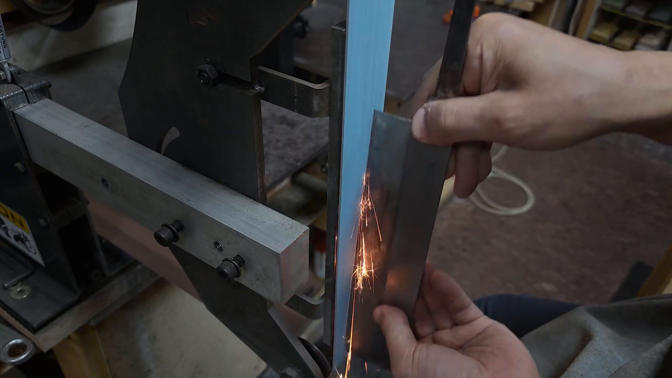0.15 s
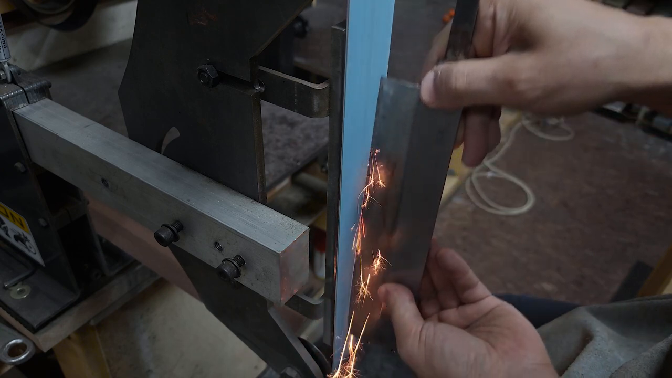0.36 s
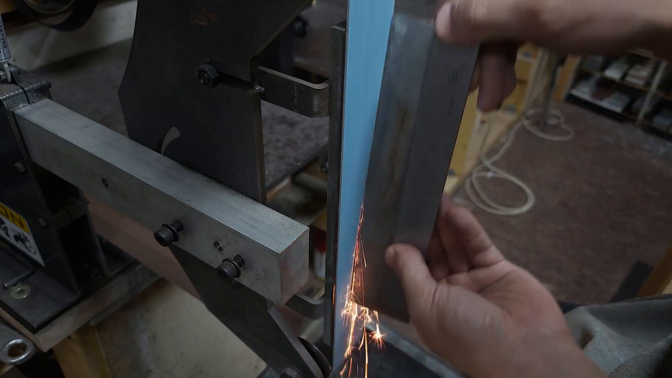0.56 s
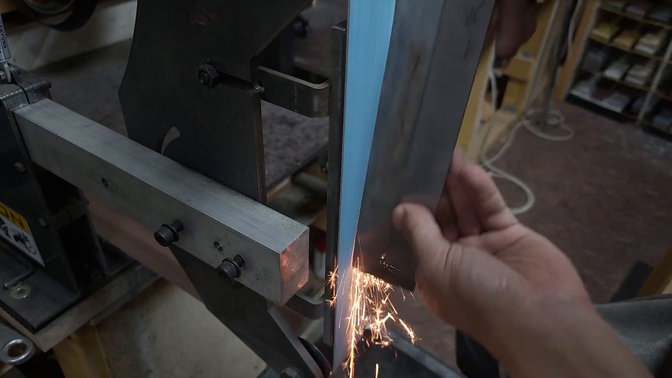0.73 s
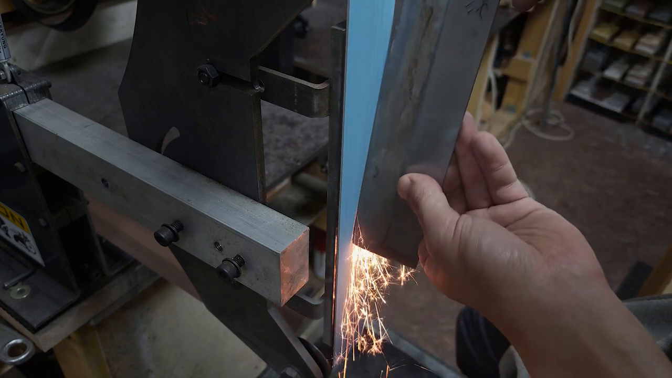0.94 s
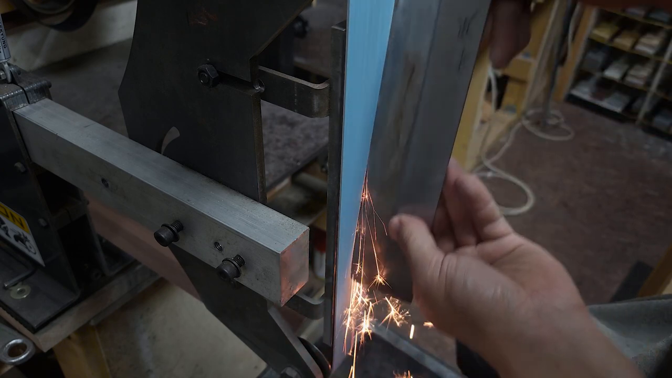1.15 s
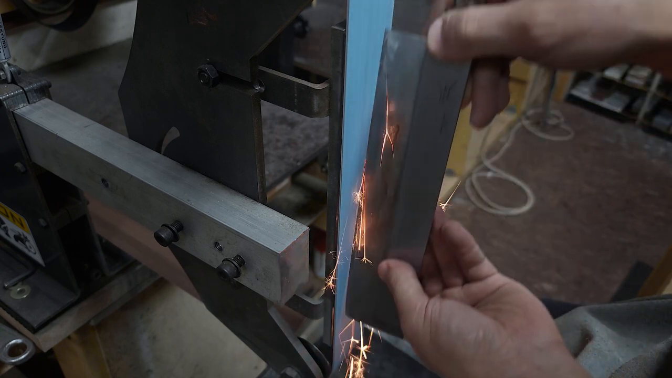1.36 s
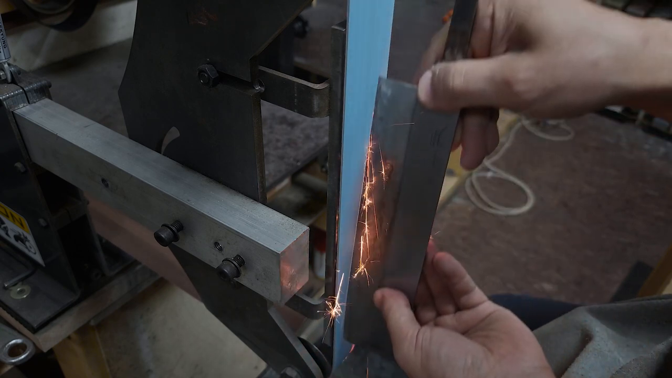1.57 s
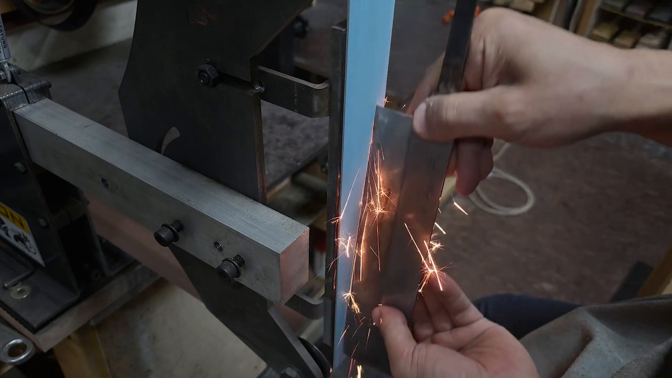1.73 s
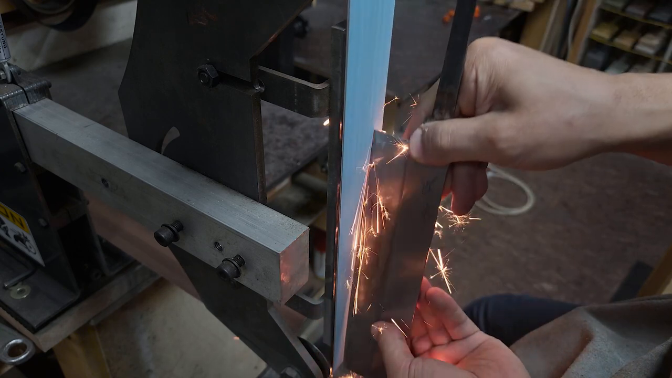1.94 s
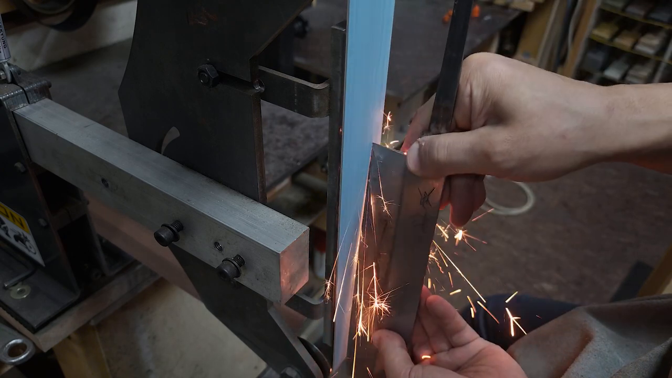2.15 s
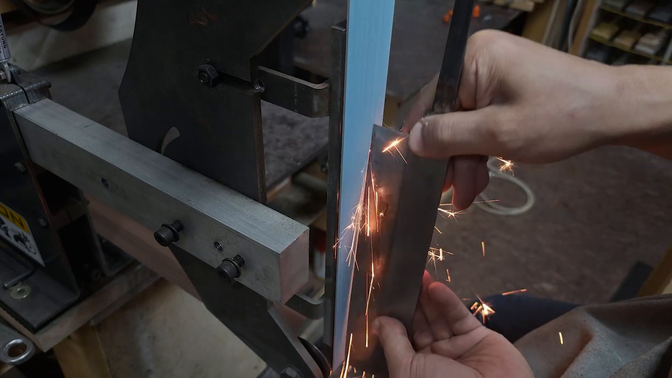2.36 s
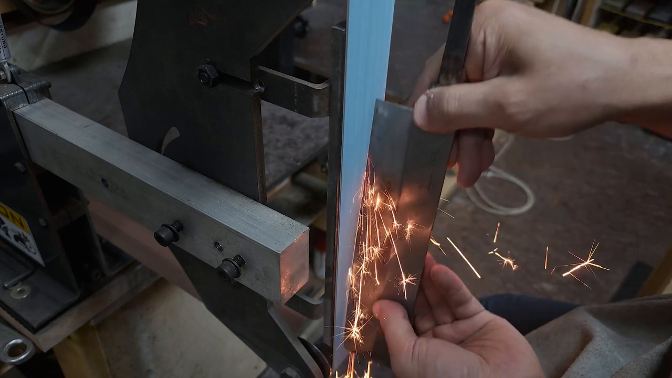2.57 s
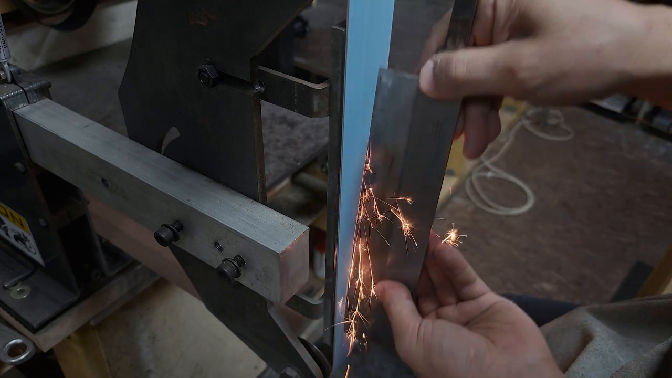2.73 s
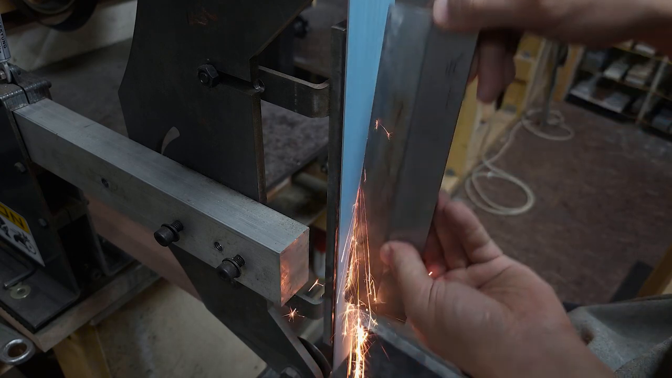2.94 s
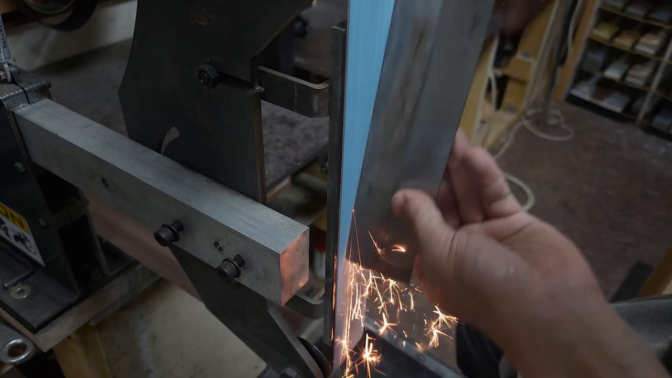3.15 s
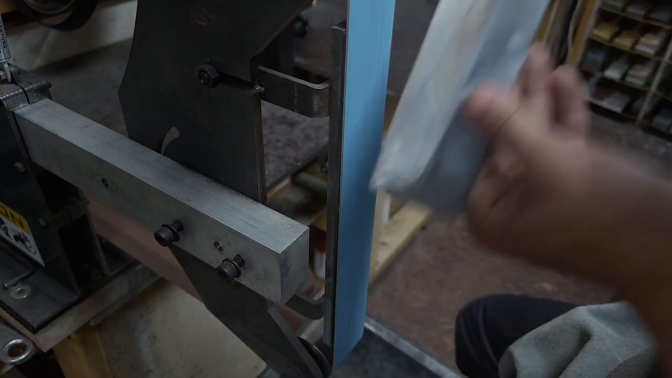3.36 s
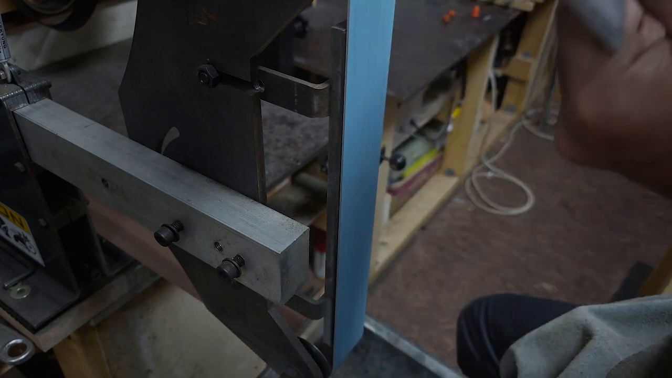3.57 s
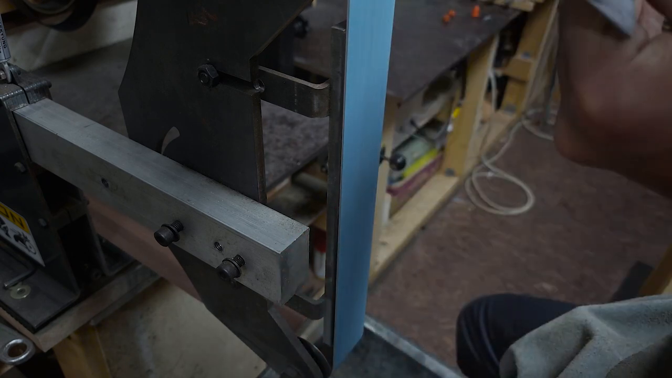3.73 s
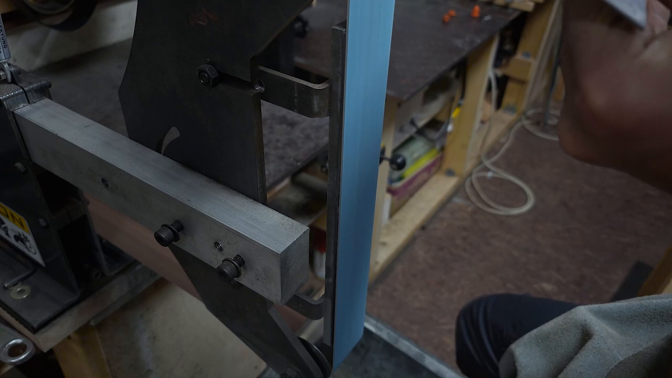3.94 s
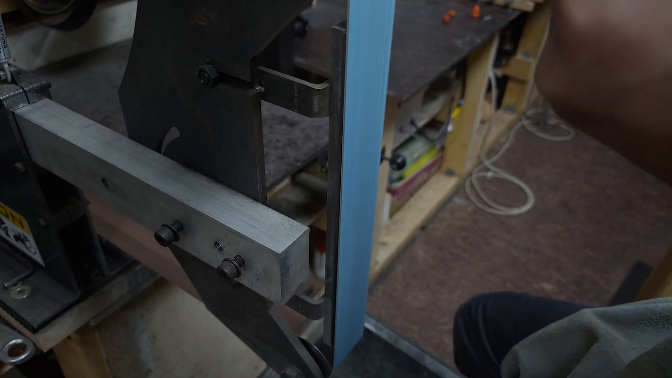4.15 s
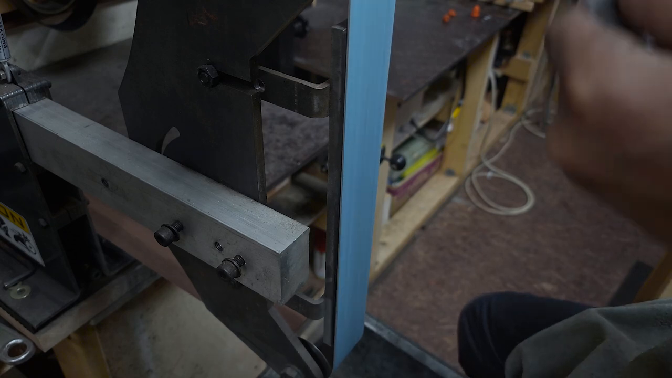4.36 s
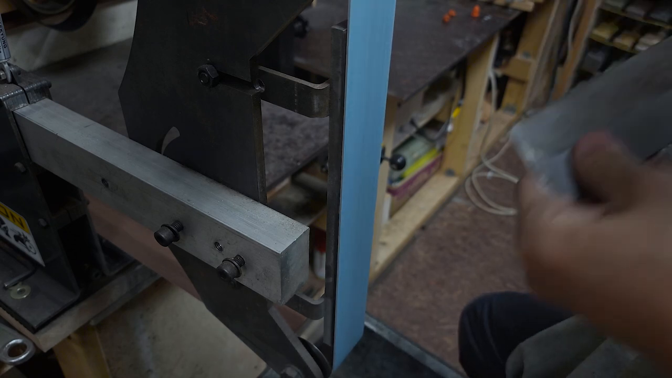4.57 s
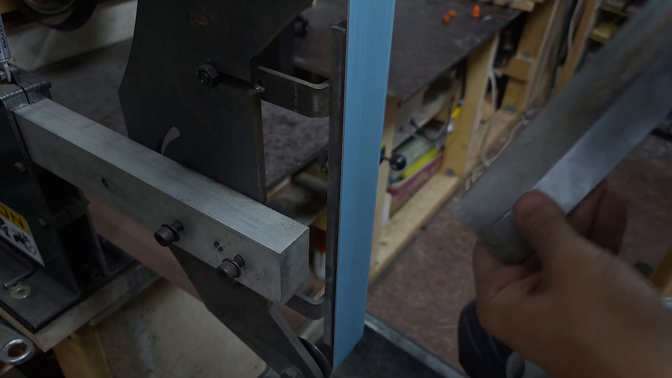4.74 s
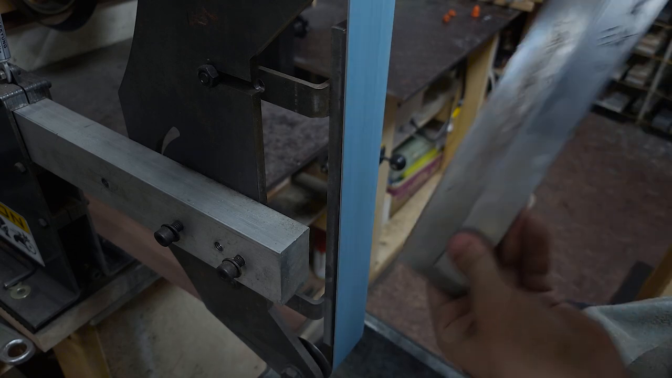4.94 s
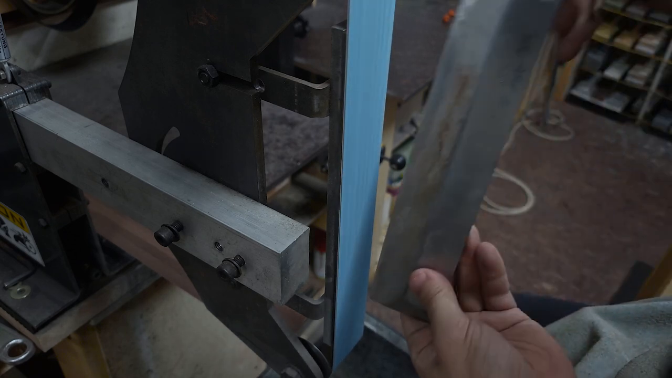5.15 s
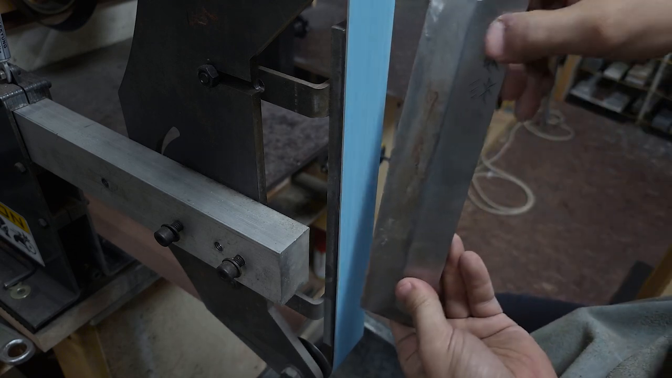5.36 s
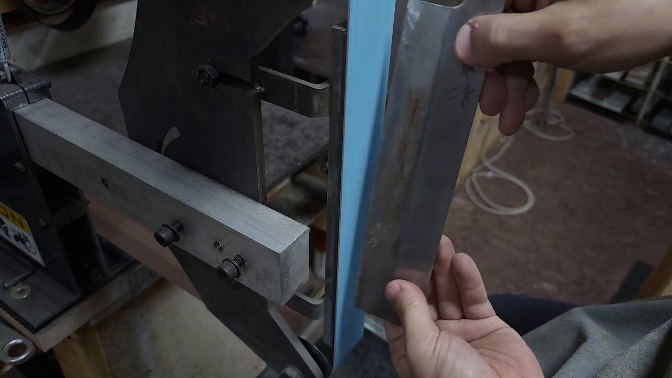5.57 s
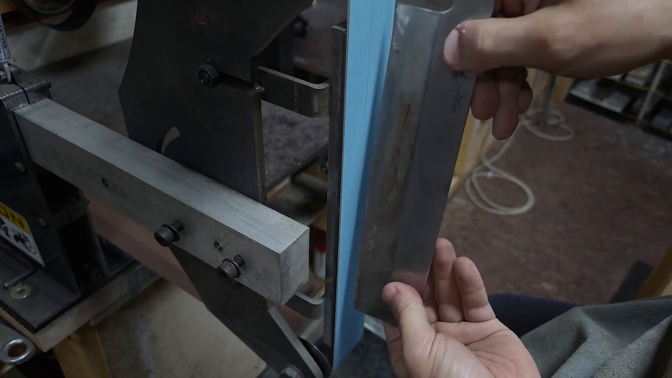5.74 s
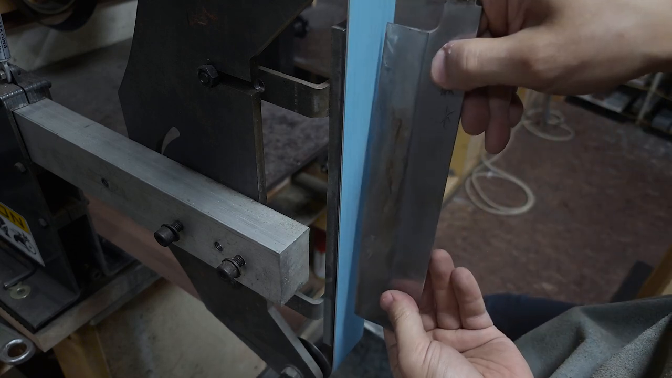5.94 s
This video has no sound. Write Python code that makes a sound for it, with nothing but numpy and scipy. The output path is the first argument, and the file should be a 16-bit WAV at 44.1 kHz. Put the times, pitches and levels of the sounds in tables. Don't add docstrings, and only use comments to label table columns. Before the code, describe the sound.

The sound starts mid-grind: a steel blade pressed on a running abrasive belt, close to a small camera microphone in a workshop, nearly mono. From 0 to 3.25 s there is a continuous bright, gritty hiss full of metallic resonances, strongest in the treble, its colour sweeping as the contact moves along the blade and back. The pressure wavers; short, sudden bites stand out around 0.1, 0.65, 0.9, 1.7 and 2.5 s, the strongest clustering from 2.8 to 3.2 s, with faint low thumps of the shaken microphone. Looser grip makes the midrange ring swell around 0.8 and 1.2 s. At 3.25 s the scrape stops abruptly, leaving a high metallic ring for a few tenths. The far quieter idle swells until about 4.5 s, then holds to about 6 s: fluttering belt hiss, low hum throbbing about four times a second, narrow bearing ring and thin inverter whine, slightly shaded by passing hands.

```python
import sys
import numpy as np
from scipy import signal
from scipy.fft import rfft, irfft
from scipy.io import wavfile
from scipy.ndimage import uniform_filter1d

SR = 44100
rng = np.random.default_rng(int(sys.argv[2]) if len(sys.argv) > 2 else 0)


def makeup_ratio(level_db):
    decades = np.asarray(level_db, float) / 20
    return 10 ** decades


def put_to_file(sound):
    columns = np.atleast_2d(sound).T
    safe = np.clip(columns, -1, 1)
    whole_steps = np.round(safe * 32767)
    wavfile.write(sys.argv[1], SR, whole_steps.astype(np.int16))


N = 269010
TIME = np.arange(N) / SR
LIFT_S = 3.253
GRIND_LENGTH = int(3.5 * SR)
TOP_HZ = 15740

BLADE_LOW_HZ = [290, 431, 646, 1350, 1652, 1910, 2423, 2630, 3076, 3466, 4260, 4800, 5220, 5620, 5991]
BLADE_HIGH_HZ = [6440, 6618, 7150, 7298, 7952, 8760, 9210, 9770, 10600, 10900, 11550, 12600, 13710, 14830,
                 15250]
# (width [Hz], level [dB], bend along blade [rad], bend phase
BLADE = [(76.6, -29.5, 0.84, 0.45, 1.97), (47.5, -27, 1.91, 0.57, 1.25), (31.6, -34, 2.54, 2.3, 0.7),
         (38.6, -32.5, 5.26, 0.13, 2.1), (30, -12, 1.11, 0.8, 1.57), (38, -25.5, 4.7, 0.74, 0.73),
         (32.4, -17.5, 2.46, 1.79, 2), (40.6, -15, 2.42, 3.06, 0.8), (54, -21, 4.1, 0.91, 0.3),
         (52, -26.5, 5.4, 2.1, 0.19), (42, -18, 2.65, 2.1, 1.5), (86.5, -5.5, 0.75, 1.573, 3.16),
         (56, -18.5, 7.4, 0.79, 0.72), (60, -19.5, 2.4, 2.5, 2), (50.7, -2.5, 1.74, 0.99, 2.47),
         (80, -27, 3.1, 0.94, 3.4), (84, -7.5, 7.07, 0.82, 0.58), (70, -13, 4.4, 0.4, 2.3),
              (81, -10, 2.26, 2.11, 2.1), (97, -13, 1.78, 2.85, 1.5), (101, -13, 1.26, 3, 2.6),
              (67, -37, 5.2, 0.99, 3.4), (120, -21, 8.1, 0.7, 0.64), (82, -16.5, 0.81, 0.65, 2.1),
              (90, -23, 3, 0.14, 1.3), (140, -20.5, 2.6, 2.3, 1.3), (300, -12.5, 0.58, 0.35, 2.9),
              (140, -17, 4.3, 2, 0.78), (120, -14, 1.1, 1, 2.3), (200, 1.5, 1.1, 1.16, 2.6)]
# (frequency [Hz], width [Hz], level [dB], bend [rad], phase [rad], node depth [-])
HOLDER = [(809, 56, -38.5, 3.0, 0.66, 1.8), (3800, 29, -38, 2.2, 1.85, 0.88),
          (8870, 100, -18, 2.3, 2.6, 0.95)]
# (band start [Hz], level [dB], bend [rad], phase [rad], node depth [-])
SCRATCH = [(150, -25, 0.42, 1.05, 1.2), (533, -30, 2.8, 1.9, 0.043), (1213, -22.5, 5, 0.23, 0.54),
           (2093, -21, 1.3, 1.7, 0.29), (3215, -14.5, 3.4, 1.5, 1.33), (4200, -15.5, 3.2, 1.5, 0.57),
           (5450, -7, 0.71, 2.25, 0.36), (6900, -17, 3.4, 0.48, 0.65), (7600, -14, 8.5, 2.3, 0.57),
           (9000, -9, 2.65, 1.23, 0.56), (10300, -10.5, 3.2, 0.84, 0.33), (11960, -19, 2.4, 1.7, 0.59),
           (13500, -13, 0.5, 1.8, 0.44), (14500, -9.5, 0.53, 0.57, 0.76)]
# (time [s], place along blade [0-1])
SLIDE = [
    (0.0, 0.4),
    (0.45, 0.52),
    (0.75, 0.76),
    (1.0, 0.85),
    (1.3, 0.71),
    (1.7, 0.27),
    (2.2, 0.08),
    (2.8, 0.44),
    (3.25, 0.89),
]
# (time [s], level [dB])
PRESSURE = [
    (0.0, -33),
    (0.35, -31),
    (0.85, -33.5),
    (1.2, -33.5),
    (1.7, -34),
    (2.06, -31.5),
    (2.23, -33.5),
    (2.5, -31),
    (3.1, -33.5),
]
# (time [s], peak [dB], extra brightness [dB])
BITES = [(0.102, -12.5, 9), (0.325, -17, 5), (0.654, -9, -5), (0.766, -17, -5), (0.913, -10.5, 3),
         (1.208, -13, -11), (1.641, -11, 7), (1.687, -2, -15), (1.778, -13, 10), (2.173, -15, 14),
         (2.207, -20, 22), (2.526, -8, 3), (2.658, -11, -8), (2.823, 0, -8), (3.061, -0.5, -5),
         (3.112, 1, -4), (3.181, -6, -5)]
# (time of clamping [s], extra ring [dB], slackening [s])
SLACK = [
    (0.36, 3, 0.26),
    (0.79, 10.5, 0.2),
    (1.2, 6.5, 0.23),
    (1.7, -0.5, 0.07),
    (2.11, 7.5, 0.097),
    (2.54, -0.5, .1),
    (2.7, 2, 0.15),
    (2.85, -1.5, 0.061),
    (3.2, 4, .12),
]
# (time [s], peak [dB])
THUMPS = [(0.029, -67), (0.114, -64), (0.189, -52), (0.249, -53), (0.309, -59), (0.599, -57), (0.669, -60),
          (0.729, -56), (0.921, -48), (1.109, -64), (2.011, -53), (2.119, -52), (2.179, -53), (2.279, -60),
          (2.501, -53), (2.529, -52), (2.936, -53), (3.114, -63), (3.189, -59)]
# (time [s], peak [dB], frequency [Hz], decay [s])
KNOCKS = [
    (0.769, -44, 860, 0.003),
    (0.9214, -43, 150, 0.0044),
    (1.211, -43, 1220, 0.0033),
    (1.918, -44, 406, 0.0031),
    (3.115, -37, 1090, 0.00095),
]
# (frequency [Hz], level [dB per Hz])
BELT = [(40, -35), (90, -17), (200, -17), (450, -13), (1100, -17.5), (2200, -13), (3700, -10.5),
        (6500, -11.5), (8600, -12), (9000, -16.5), (10000, -20.5), (11800, -14), (12500, -17), (15700, -24)]
# (frequency [Hz], width [Hz], level [dB])
FRAME = [(447.4, 28, -3.5), (832, 56, -10.5), (1218, 22, -5), (1570, 400, -8.5), (2940, 350, -8),
         (3680, 25, -4), (5720, 190, -10), (6950, 330, -7)]
# (frequency [Hz], level [dB])
HUM = [(50, -33), (63.9, -30), (78, -33), (114, -28), (127.7, -11), (141.8, -20)]
# (frequency [Hz], level [dB])
WHINE = [(7895, -63), (7916, -68), (7958, -68), (8001, -60), (8043, -63), (8064, -69), (8086, -70),
         (8107, -71), (8150, -71), (8236, -71),
         (3638, -69), (11811, -78), (11937, -61), (11978, -74), (12021, -74), (12065, -65),
               (12193, -76)]
# (time [s], length [s], bearing loss [dB], whine loss [dB])
HANDS = [
    (3.45, 0.65, 22, -1.5),
    (3.95, 0.76, 4, 7),
    (4.28, .3, 5, 1),
    (5.72, 0.4, 14, 0.5),
]
# (frequency [Hz], level [dB], time to fall 60 dB [s])
FREE_RING = [(6002, -60, 0.1), (7300, -51, 0.33), (8840, -50, 0.1), (9770, -57, .2), (10800, -57, .19),
             (11690, -52, 0.2), (14590, -56, .2)]
# (time [s], low edge [Hz], high edge [Hz])
SPLITS = [(1.32, 6900, 9000), (2.665, 6560, 8300), (2.664, 9600, 11200), (2.805, 6500, 7600),
          (2.804, 10300, 11900), (2.897, 12800, 14500), (3.686, 4220, 5700), (3.686, 9600, 11800),
          (3.826, 9600, 11000), (3.895, 9000, 11000), (4.707, 4260, 5060), (4.707, 14500, 15700),
          (4.87, 5300, 6200), (4.87, 9600, 11000), (4.87, 14500, 15700), (5.079, 4700, 5700),
          (5.288, 12500, 13800)]

GRIT_DB = 1.6
CROWD_HZ, CROWD_DB = 130, 4
GRIPPED_DB, CLAMP_S, SQUEEZE_DB = -15.5, 0.02, 1.5
EASE_S, EASE_DB_PER_S, EASE_LENGTH_S = 3.2, 298, 0.019
THUMP_HZ = 45.6
SUPPLY_HZ, LAP_HZ, LAP_TONE_HZ = 42.7, 4.3, 186.3
BEARING_DB = -14
IDLE_DB, DUCK_DB, DUCK_AT_START_DB, DUCK_S = -46, 12.5, 3.5, 0.3
HOLD_S, RECOVER_DB_PER_S, BASS_LEAD_DB = 0.037, 10, 3.5


def unit(x):
    return x / np.sqrt(np.mean(x ** 2))


def curve(table):
    s, *columns = np.transpose(table)
    return [np.interp(TIME, s, column) for column in columns]


def colour(x, table):
    hz, db = np.transpose(table)
    bins = np.arange(N // 2 + 1) * SR / N + 1
    return irfft(rfft(x) * makeup_ratio(np.interp(np.log(bins), np.log(hz), db)), N)


def ring(x, hz, width):
    b, a = signal.iirpeak(hz, hz / width, fs=SR)
    return signal.lfilter(b, a, x) * np.sqrt(SR / (np.pi * width))


def band_pass(x, order, low_hz, high_hz):
    return signal.sosfilt(signal.butter(order, (low_hz, high_hz), "band", fs=SR, output="sos"), x)


def walk(rate, size=N):
    k = int(SR / rate)
    steps = np.repeat(rng.standard_normal(size // k + 1), k)
    smooth = uniform_filter1d(uniform_filter1d(steps, k), k)
    return unit(smooth[:size])


def reach(place, bend, phase, depth):
    return (np.cos(bend * place + phase) ** 2 + 0.094) ** (depth / 2)


def bites():
    dull, bright = np.ones(N), np.ones(N)
    for s, peak_db, bright_db in BITES:
        rise = np.clip((TIME - s) * SR / 40, 0, 1)
        fall = np.exp(-np.clip(TIME - s, 0, 1) / 0.012)
        surge = makeup_ratio(peak_db + 2) * fall * rise
        dull += surge
        bright += surge * makeup_ratio(bright_db)
    return dull, bright


def slack():
    t, db = TIME[:GRIND_LENGTH], 0
    for s, ring_db, rise in SLACK:
        after = np.clip(t - s, 0, 9)
        db = db + ring_db * np.clip(1 + (t - s) / rise, 0, 1) * np.exp(-after / CLAMP_S)
        db = db - SQUEEZE_DB * after / 0.1 * np.exp(1 - after / 0.07) * ring_db / 10
    return db


def crowd(grains, place, count):
    n, out = len(grains), 0
    spacing = int(CROWD_HZ * n / SR)
    for zone in range(count):
        ripple = uniform_filter1d(np.repeat(rng.standard_normal(200), spacing), spacing)
        spectrum = rfft(grains * rng.standard_normal(n))
        comb = irfft(spectrum * makeup_ratio(CROWD_DB * ripple[:n // 2 + 1]), n)
        nearness = np.clip(1 - np.abs(place * (count - 1) - zone), 0, 1)
        out = out + unit(comb) * np.sqrt(nearness)
    return out


def blade():
    n = GRIND_LENGTH
    t = TIME[:n]
    pressure_db, place = (curve(table)[0][:n] for table in (PRESSURE, SLIDE))
    level_db = pressure_db - EASE_DB_PER_S * np.clip(t - EASE_S, 0, EASE_LENGTH_S)
    loose_db = level_db + GRIPPED_DB + slack()
    dull, bright = (surge[:n] for surge in bites())
    touching = np.exp(-np.clip(t - LIFT_S, 0, 1) / 0.011)
    wobble = touching * makeup_ratio(0.2 * walk(10, size=n) + 1.1 * walk(45, size=n))
    dull_low = dull * np.exp(-np.clip(t - LIFT_S + 0.036, 0, 1) / 0.057)
    grains = makeup_ratio(GRIT_DB * np.minimum(rng.exponential(size=n), 4))

    pitches = BLADE_LOW_HZ + BLADE_HIGH_HZ
    modes = [(hz, *row) for hz, row in zip(pitches, BLADE)] + HOLDER
    out = np.zeros(n)
    for hz, width, db, *shape in modes:
        drive_db = loose_db + 13.5 if 2300 < hz < 3200 else level_db
        surge = bright if hz > 9500 else dull if hz > 4500 else dull_low
        force = wobble * makeup_ratio(drive_db + 1.44 * walk(9.49, size=n)) * surge
        grit = unit(grains * rng.standard_normal(n))
        ring_width = width * (1.9 if 4500 < hz < 5700 else 0.75)
        out += makeup_ratio(db + 2) * ring(grit * force * reach(place, *shape), hz, ring_width)

    hiss = crowd(grains, place, count=6)
    edges = [row[0] for row in SCRATCH] + [1.02 * TOP_HZ]
    for low_hz, high_hz, (_, db, *shape) in zip(edges, edges[1:], SCRATCH):
        grit = np.roll(hiss, int(low_hz) // 40)
        band = unit(band_pass(grit, 3, low_hz, high_hz))
        flicker_db = 0.93 * walk(11, size=n) - 3
        surge = bright if low_hz > 8500 else dull if low_hz > 4000 else dull_low
        force = wobble * makeup_ratio(level_db + flicker_db) * surge
        out += makeup_ratio(db) * band * force * reach(place, *shape)
    return np.pad(out, (0, N - n))


def shade(index):
    loss_db = 0
    for row in HANDS:
        passing = np.clip((TIME - row[0]) / row[1], -0.5, 0.5)
        loss_db = loss_db + row[index] * np.cos(passing * np.pi) ** 2
    return -loss_db


def machine():
    hiss = unit(colour(rng.standard_normal(N), BELT))
    supply = 2 * np.pi * SUPPLY_HZ * TIME
    flutter = makeup_ratio(0.5 * np.sin(supply) + 0.66 * np.sin(3 * supply) + 0.36 * walk(5.72))
    frame, hum, whine = np.zeros(N), np.zeros(N), np.zeros(N)
    for hz, width, db in FRAME:
        rattle = ring(rng.standard_normal(N), hz, width)
        frame += makeup_ratio(db + 0.26 * walk(4.5)) * np.sqrt(width) * rattle
    for hz, db in HUM:
        turns = hz * TIME + 0.032 * walk(3.3) + rng.random()
        hum += makeup_ratio(db + 1.5 + 0.75 * walk(4.97)) * np.sin(2 * np.pi * turns)
    for hz, db in WHINE:
        turns = hz * TIME + 0.04 * walk(8) + rng.random()
        whine += makeup_ratio(db + 50 + walk(6)) * np.sin(2 * np.pi * turns)
    throb_db = -21 + 4 * np.sin(2 * np.pi * (LAP_HZ * TIME + 0.32)) + 2.4 * walk(4.95)
    lap = makeup_ratio(throb_db) * np.sin(2 * np.pi * LAP_TONE_HZ * TIME)
    return makeup_ratio(-1.2) * hiss * flutter + makeup_ratio(-5) * unit(frame) + hum + lap + whine * makeup_ratio(shade(index=3))


def gain_control():
    duck_db = DUCK_DB - (DUCK_DB - DUCK_AT_START_DB) * np.exp(-TIME / DUCK_S)
    released_db = RECOVER_DB_PER_S * np.clip(TIME - LIFT_S - HOLD_S, 0, 9)
    return IDLE_DB - np.maximum(duck_db - released_db, 0)


def thumps():
    out, t = np.zeros(N + SR), np.arange(SR // 8) / SR
    for s, peak_db in THUMPS:
        swing = np.sin(2 * np.pi * THUMP_HZ * t) * np.exp(-t / 0.0088)
        out[int(s * SR):][:len(t)] += makeup_ratio(peak_db + 5.5) * swing
    for s, peak_db, hz, decay in KNOCKS:
        knock = np.sin(2 * np.pi * hz * t) * np.exp(-t / decay)
        out[int(s * SR):][:len(t)] -= makeup_ratio(peak_db) * knock
    return signal.sosfilt(signal.butter(2, 28, "high", fs=SR, output="sos"), out[:N])


def ring_out():
    after = np.clip(TIME - LIFT_S, -0.01, 1)
    swell = np.clip(1 + after / 0.01, 0, 1)
    out = np.zeros(N)
    for hz, db, t60 in FREE_RING:
        tone = np.sin(2 * np.pi * (hz * after + rng.random()))
        out += makeup_ratio(db - 60 * np.maximum(after, 0) / t60) * swell * tone
    return out


def bearing():
    lifted = TIME > LIFT_S
    return lifted * makeup_ratio(BEARING_DB + shade(index=2)) * ring(rng.standard_normal(N), 3640, 20)


def scene():
    gain_db = gain_control()
    grinding = blade() + thumps()
    idle = machine() + bearing()
    bass = signal.sosfilt(signal.butter(2, 700, fs=SR, output="sos"), idle)
    still_ducked = np.clip((IDLE_DB - gain_db) / DUCK_DB, 0, 1)
    lead = (TIME > LIFT_S + 0.06) * (makeup_ratio(BASS_LEAD_DB * still_ducked) - 1)
    mono = grinding + (idle + lead * bass) * makeup_ratio(gain_db) + ring_out()
    return np.array([mono, mono])


def top_cut(x):
    return signal.sosfilt(signal.butter(12, 16440, fs=SR, output="sos"), x)


def record(dry):
    side = np.zeros(N)
    earlier = np.roll(dry[0], SR // 12)
    for s, low_hz, high_hz in SPLITS:
        band = band_pass(earlier, 6, low_hz, high_hz)
        bump = np.cos(np.clip((TIME - s) / 0.046, -0.5, 0.5) * np.pi)
        window = np.clip(1.7 * bump, 0, 1) ** 2
        side += makeup_ratio(-5) * band * window
    treble_cut = signal.ellip(16, 0.3, 60, TOP_HZ, fs=SR, output="sos")
    mix = signal.sosfilt(treble_cut, dry + np.array([side, -side]))
    return top_cut(mix)


dry = scene()
out = record(dry)
put_to_file(out)
```